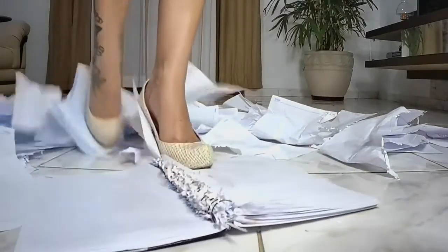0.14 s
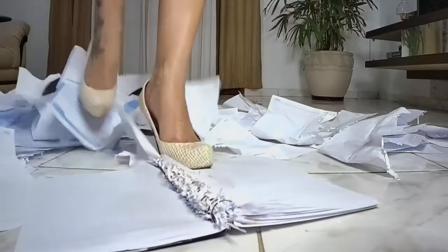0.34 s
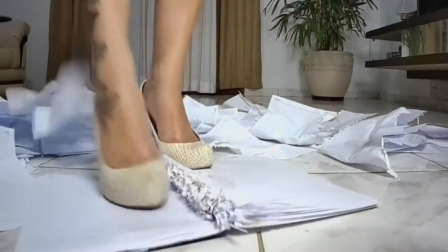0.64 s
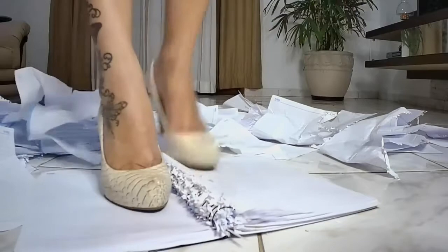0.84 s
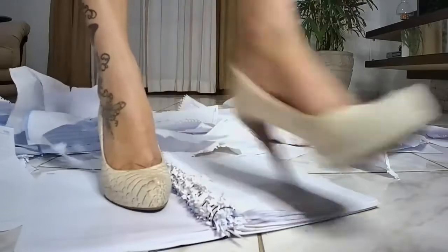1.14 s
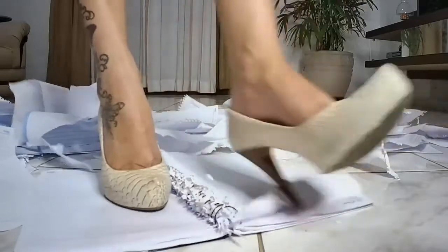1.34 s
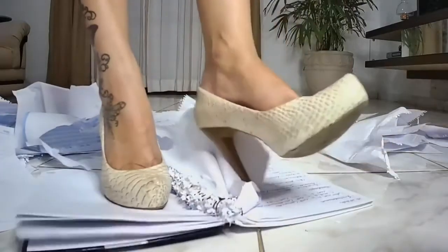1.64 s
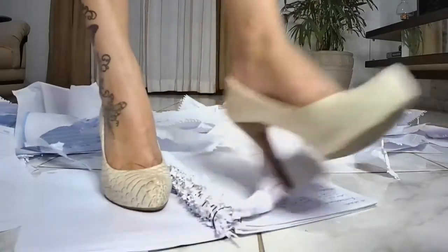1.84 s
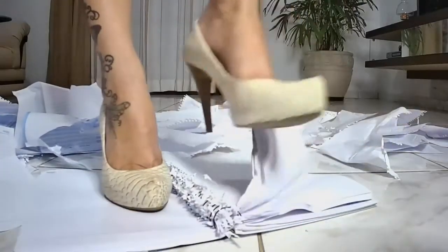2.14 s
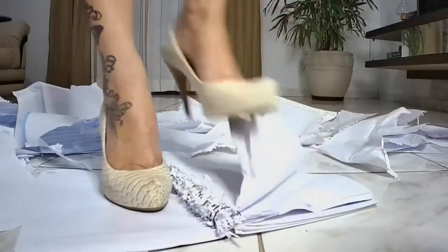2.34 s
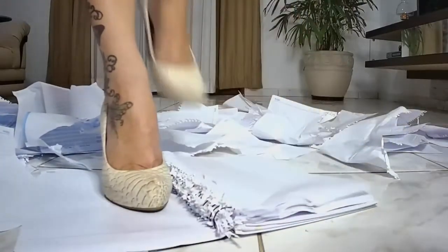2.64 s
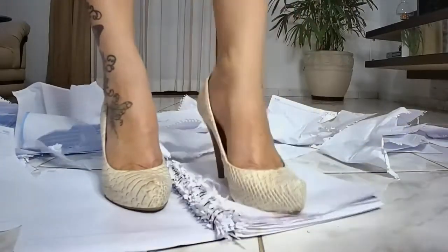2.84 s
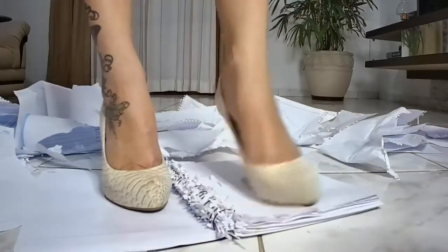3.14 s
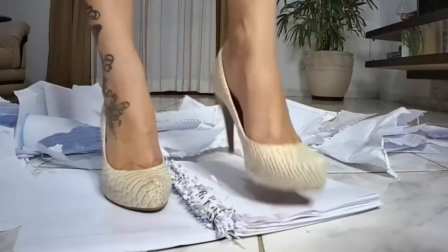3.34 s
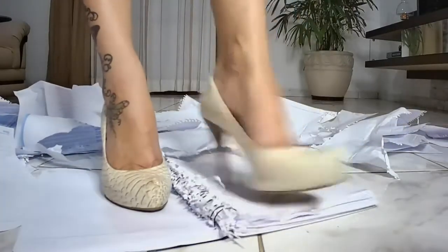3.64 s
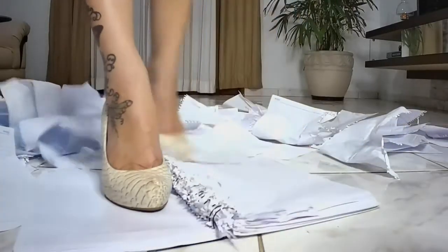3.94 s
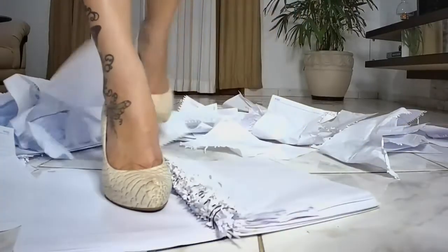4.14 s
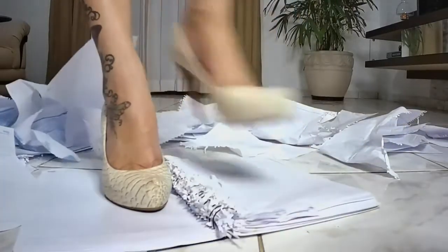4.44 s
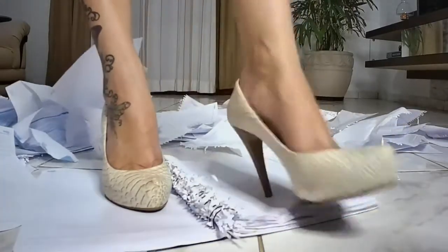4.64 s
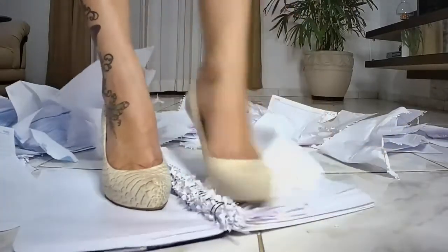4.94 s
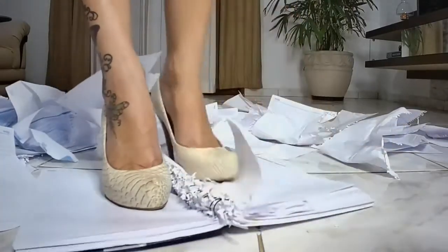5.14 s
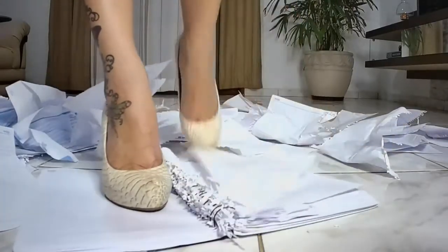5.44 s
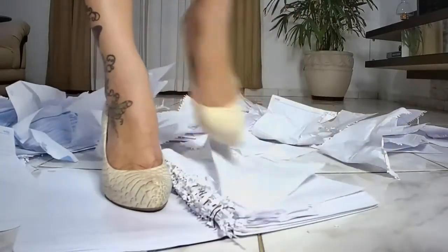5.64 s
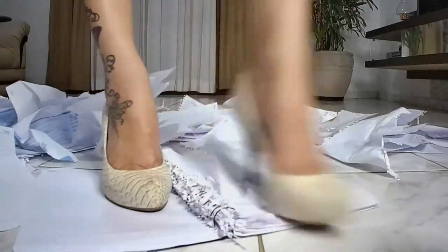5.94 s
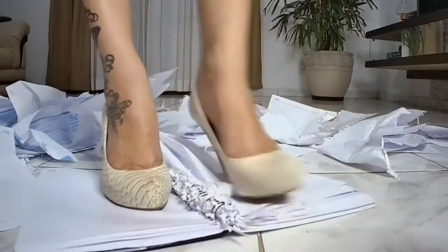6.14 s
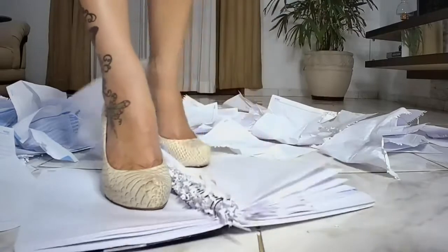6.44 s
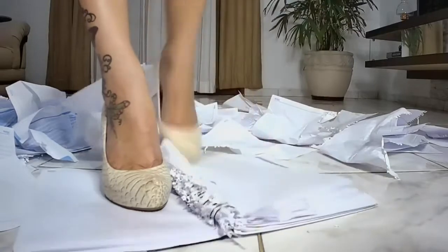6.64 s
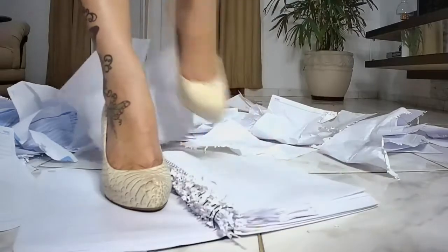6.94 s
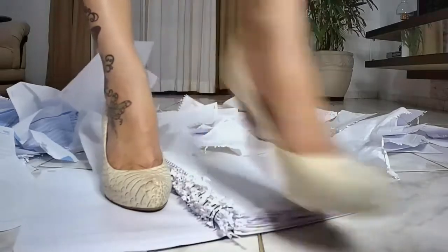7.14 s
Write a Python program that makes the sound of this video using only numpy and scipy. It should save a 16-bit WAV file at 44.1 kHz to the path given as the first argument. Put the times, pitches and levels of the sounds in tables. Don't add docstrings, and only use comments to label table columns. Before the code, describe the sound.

A close, slightly hissy phone pickup in a hard, tiled living room with a short bright ring. From 0 to 1 s paper rustles softly under a shoe, with tiny ticks. Around 1.2 s light hollow heel taps and a few crisp creases come, then faint rubbing, and small paper clicks and taps near 2.0 s. At 2.7 s a firm heel knocks the pad with a low thud. Quieter taps follow, a double knock at 3.4 s, then a loud bright drag with sharp cracks at 3.6-3.8 s, settling in rustle. After a lull, a knock at 4.6 s leads into strong crumpling and snapping around 4.9-5.0 s, with crackly scraping to 5.3 s. Near 5.9 s a crunch builds to the hardest stamp at 6.1 s, a dense burst of cracking paper. Short tugs at 6.5-6.6 s, faint rustles, and a last light scrape and tap at 7.2 s.

```python
import sys
import numpy as np
from scipy import signal
from scipy.fft import rfft, irfft
from scipy.io import wavfile
from scipy.ndimage import uniform_filter1d

SR = 44100
rng = np.random.default_rng(int(sys.argv[2]) if len(sys.argv) > 2 else 0)


def dump_mix(stems):
    frames = np.atleast_2d(stems).T
    limited = np.clip(frames, -1, 1)
    pcm = np.round(limited * 32767).astype(np.int16)
    wavfile.write(sys.argv[1], SR, pcm)


def voltage_ratio(decibels):
    exponent = np.asarray(decibels, float) / 20
    return 10 ** exponent


N = 321930

# freq_hz, level_db (per Hz)
AIR_COLOUR = [(12, -38), (20, -4.5), (47, -9.5), (140, -16.5), (180, -16), (306, -18.5), (534, -27),
              (958, -26), (1160, -28.5), (1920, -32), (8640, -39.5), (15500, -40.5)]
AIR_DB = -62.5
# freq_hz, t60_s, tail_db
ROOM_DECAY = [(121, 1, -6), (350, 0.68, -6), (1000, 0.66, -5.5), (2500, 0.66, -4.5), (6000, 0.31, -10),
              (12000, 0.17, -7)]
BAND_CENTRES_HZ = 70 * 2 ** np.arange(0, 8, .5)

# start_s, peak_db
FLOOR_THUDS = [(0.563, -39.5), (1.161, -41.5), (1.908, -42.5), (2.007, -34), (2.428, -51), (2.709, -25.5),
               (4.522, -41), (5.914, -36), (6.108, -29.5), (3.815, -35), (7.215, -47)]
FLOOR_HZ, FLOOR_OCTAVES = 116, .85
# start_s, peak_db, pitch_hz, spread_octaves
SHOE_KNOCKS = [(.6462, -40, 616, 0.34), (1.1564, -32, 468, 0.38), (1.1622, -30.5, 287, 0.93),
               (1.2315, -26.5, 630, 0.2), (1.7781, -39, 350, 0.88), (1.9716, -30.5, 506, 0.69),
               (2.0127, -35.5, 433, 0.88), (2.4288, -34, 507, .69), (2.7047, -16, 490, 0.78),
               (2.7183, -29, 900, .5), (2.724, -27, 420, 0.98), (2.9804, -28.5, 594, 0.5),
               (3.3707, -22, 387.3, 0.35), (3.3779, -18, 380, .45), (3.3812, -21, 420, .5),
               (7.243, -34, 450, .5), (5.327, -30, 700, .6), (3.376, -24, 185, .3), (6.17, -23, 175, .3),
               (3.5369, -33, 450, 0.83), (3.6791, -18, 535, 0.48), (3.6867, -32, 460, 0.3),
               (3.6944, -18.5, 425, 0.41), (3.7645, -24.5, 420, 0.9), (4.5132, -29.5, 666, .32),
               (4.5227, -34, 259, 0.37), (4.6291, -24.5, 510, 0.82), (5.1013, -29, 410, 0.93),
               (5.9272, -21, 590, 0.94), (6.0617, -28, 487, 0.97), (6.0809, -17, 650, .65),
               (6.0994, -22, 670, .3), (6.1325, -8, 520, 0.92), (6.4941, -30, 536, 0.78),
               (7.2189, -28.5, 620, 0.35)]

# start_s, length_s, centre_hz, spread_octaves, level_db
SINGING_HOLLOWS = [(2.165, 0.17, 8400, 0.37, -56), (3.39, .18, 300, .5, -49), (4.635, .09, 800, 1, -47),
                   (5.245, 0.06, 4300, 0.6, -35), (6.3, .16, 1450, .4, -47), (6.595, .03, 4000, .5, -35),
                   (0.685, .2, 1240, .25, -58), (6.1, .1, 1060, 0.7, -33), (4.745, .06, 750, 1.3, -39),
                   (4.9, .11, 450, 1.3, -37), (6.2, .13, 11000, .6, -35), (6.49, .06, 1500, 2, -45),
                   (6.66, .2, 1000, 1.6, -55), (7, .05, 400, 1, -55), (5.85, .025, 5500, 1, -36),
                   (.5, .06, 6000, 1.2, -60), (.6, .06, 6000, 1.2, -60), (6.8, .09, 7000, 1.8, -63),
                   (5.79, .025, 2200, 1, -57), (1.245, .03, 650, .6, -44), (5.69, .1, 1450, .15, -61),
                   (5.69, .09, 2800, .12, -61)]
# start_s, length_s, centre_hz, spread_octaves, level_db
FOLD_RATTLES = [(.348, .011, 3600, 1.3, -36), (.362, .03, 3500, 1, -48), (.399, .008, 700, .8, -48),
                (.421, .01, 1300, .7, -47), (.452, .012, 1050, 1.2, -42), (.553, .009, 1100, 1.2, -46),
                (.564, .009, 1200, 1.5, -48), (.576, .011, 700, 1.2, -46), (1.225, .012, 2200, 1.5, -42),
                (1.252, .012, 1300, 1, -40), (1.275, .01, 2500, 1.5, -43), (1.973, .009, 3200, 1.5, -39),
                (1.997, .008, 2600, 1.2, -43), (2.084, .012, 2600, 1, -44), (2.692, .009, 1300, 1.2, -38),
                (2.704, .026, 1800, 1.5, -33), (3.388, .018, 1300, 1.2, -46), (3.82, .07, 2000, 1.8, -33),
                (5.22, .03, 3800, .6, -38), (5.222, .07, 10000, .6, -36), (5.27, .03, 4700, .6, -26),
                (5.322, .03, 6000, 2.2, -35), (5.876, .008, 4100, .4, -27), (5.926, .008, 1500, 1, -29),
                (6.06, .2, 11000, .7, -34), (6.102, .008, 400, .8, -30), (6.14, .025, 900, 1, -27),
                (6.164, .006, 1450, .5, -22), (6.909, .008, 2700, .3, -48), (6.935, .03, 7500, .6, -51),
                (7.027, .008, 1400, 1, -44), (7, .065, 6500, 1.4, -53), (7.135, .014, 2700, .3, -58),
                (7.205, .03, 8500, .7, -46), (7.24, .016, 1000, 1.3, -44), (7.28, .02, 1300, .8, -41),
                (4.89, .22, 11000, .6, -38), (3.41, .035, 330, .7, -44), (3.48, .05, 190, .7, -50)]

# start_s, peak_db, centre_hz
WIDE_CRACKS = [(.3505, -27, 2200), (.6739, -27, 3900), (1.231, -29, 1600), (1.2478, -24.5, 1750),
               (1.255, -16, 7200), (1.2871, -25, 2600), (1.8923, -28, 5240), (2.7052, -21.5, 1270),
               (3.3655, -35.5, 2500), (3.3763, -26, 4500), (3.6271, -12.5, 8400), (3.6547, -14, 4140),
               (3.8172, -15, 2010), (4.6284, -26, 2200), (4.7392, -22, 7100), (4.918, -17.5, 2230),
               (4.9233, -10.5, 2200), (5.0031, -10, 2600), (5.9212, -11, 2500), (6.0803, -13.5, 1770),
               (6.0975, -7.5, 2600), (6.1148, -5.5, 2660), (6.123, -5.5, 2160), (6.1419, -5.5, 4020),
               (6.1548, -6.5, 3110), (6.1662, -6.5, 1600), (6.5608, -19, 4930), (6.5805, -23, 4500),
               (6.603, -23, 4270), (7.2185, -36, 1640),
               (.4535, -36, 4000), (1.2515, -29, 4500), (1.278, -31, 8000), (4.5095, -41, 3500),
               (.848, -47, 1990), (2, -38, 1800), (3.651, -12, 8000), (3.678, -21, 4030),
               (3.685, -22, 5000), (4.9746, -12.5, 2290), (5.0095, -24, 3000), (5.855, -33, 5000),
               (5.895, -21, 5000), (5.908, -20, 6000), (6.112, -18, 4030), (6.1458, -12, 2200),
               (6.1588, -12, 1300), (6.9103, -33, 1500), (6.926, -39, 4000), (7.047, -39, 2500),
               (1.532, -42, 1000), (1.6766, -42, 900)]
# start_s, peak_db, centre_hz
CREASE_CLICKS = [(.1378, -41, 1800), (1.189, -40, 800), (4.773, -26, 3000), (.4906, -51, 2180),
                 (.5785, -44, 1730), (.6454, -43, 1590), (.7145, -29.5, 4700), (1.363, -28, 6050),
                 (1.3867, -38, 5830), (1.7057, -42, 2760), (1.777, -45, 1950), (1.9263, -33, 3700),
                 (2.3263, -47, 2500), (2.7162, -24, 3500), (2.9634, -55, 2060), (3.5363, -36, 1360),
                 (3.7077, -15, 2000), (4.5186, -34, 2200), (4.5624, -49, 1700), (4.7496, -44, 2530),
                 (4.7837, -41, 2360), (5.3213, -19, 4500), (5.4505, -38, 2580), (5.8196, -42, 2270),
                 (5.8268, -37, 1640), (6.173, -28, 2350), (6.3664, -30, 4600), (6.4807, -33, 5500),
                 (7.0299, -37, 1500), (7.2478, -32, 2500)]
# start_s, peak_db, centre_hz
CREASE_PINGS = [(.5547, -36.5, 1330), (1.0935, -45, 2320), (1.1532, -36, 1130), (1.9717, -22, 2250),
                (1.9775, -24.5, 2820), (2.0039, -34, 2250), (2.0077, -26, 2460), (2.019, -31, 2380),
                (2.0825, -19, 2550), (2.0881, -32, 2940), (2.387, -53, 2300), (2.428, -40, 2000),
                (2.7158, -15, 8500), (2.9796, -31.5, 1700), (3.371, -26.5, 900), (3.8025, -12.5, 4400),
                (4.2853, -43, 2100), (4.5124, -34.5, 1000), (4.9784, -23, 2550), (5.1552, -28.5, 2430),
                (5.6892, -37.5, 1410), (5.8786, -20, 6500), (5.9286, -18, 2040), (6.4584, -31, 5500),
                (6.9138, -50, 2600), (7.1346, -43, 1600), (7.2067, -33, 1790), (7.2845, -31, 1350)]
# start_s, peak_db, centre_hz
EDGE_TICKS = [(4.7377, -24, 11300), (4.9223, -22, 10500), (5.0028, -17, 12500), (5.8955, -25, 11500),
              (5.907, -23, 11500), (6.0975, -21, 11000), (6.1145, -19, 9500), (6.1425, -17, 11500),
              (6.167, -20, 11000), (6.253, -27, 11500), (3.852, -22, 11500), (3.819, -22, 9500),
              (3.678, -21, 12000), (1.2555, -22, 11000), (7.031, -42, 5500), (3.3763, -32, 1500),
              (3.829, -16, 2000), (5.328, -25, 4300), (2.108, -40, 4800), (6.91, -44, 7000),
              (5.492, -38, 11000), (5.51, -46, 10700)]
CRACK_OCTAVES, CLICK_OCTAVES, PING_OCTAVES = 2.5, 1.6, 0.99
ECHO_S, ECHO_DB = .0036, -14.5

# freq_hz, level_db (per Hz)
SHEET_COLOUR = [(35, -48), (60, -21), (189, -2), (308, -3.5), (389, -4), (437, 1), (593, -2), (1110, -2),
                (1580, -1.5), (11300, 4), (16000, -1.5)]
ZONE_CENTRES_HZ = [
    1700,
    400,
    4500,
    10000,
]
# level_db, brightness_share (ratio), fade_speed (ratio)
ZONE_ANSWERS = [
    (-0.5, -0.14, 1.02),
    (-7.5, -0.12, 0.99),
    (0.8, 0.48, 1.026),
    (.2, 0.73, 1.22),
]
# start_s, rise_s, hold_s, level_db, brightness_db
SETTLING_HEAPS = [(-.02, 0.011, .06, -40, -4), (.65, .035, .02, -51, -3), (1.28, 0.018, .01, -51.5, 1.5),
                  (1.83, 0.034, .005, -46.5, -7), (1.95, 0.021, 0.0037, -47.5, -8.5),
                  (2.07, .0083, .019, -61, -10), (2.72, .0085, .03, -49.5, 2),
                  (3.765, .045, .045, -30.5, -1), (4.1, 0.017, 0.041, -51.5, -5.5),
                  (4.27, .02, .04, -61, -5), (4.89, 0.015, 0.025, -30.5, -12),
                  (5.3, 0.0071, 0.0072, -42.5, -2.5), (5.68, 0.0067, .005, -61.5, -13),
                  (6.062, .05, 0.068, -28.5, -3), (6.26, 0.01, 0.0079, -45, 8.5),
                  (6.45, 0.12, 0.022, -42, 3.5), (6.95, 0.036, .075, -56, -5)]
# start_s, rise_s, hold_s, level_db, brightness_db
SHEET_DRAGS = [(.15, 0.037, 0.094, -52.5, -1), (.3, 0.023, 0.15, -49.5, -8.5),
               (.55, 0.012, 0.011, -51.5, -7.5), (1.4, 0.02, 0.16, -52.5, -4.5),
               (1.63, 0.04, 0.14, -52, -5.5), (2.952, 0.02, 0.066, -57.5, 2.5), (3.355, .012, .029, -54, 1),
               (3.505, .035, .015, -53, 5), (3.614, .02, .065, -31, 5), (4.505, 0.0035, 0.0044, -56, -9),
               (4.62, 0.03, 0.12, -52, 0), (4.83, 0.041, 0.08, -38.5, -3), (4.96, .02, .017, -44, 4),
               (5.14, .089, .032, -43.5, 11.5), (5.24, .038, .019, -43, 14.5), (5.4, .03, 0.018, -52.5, -4),
               (5.85, 0.056, 0.013, -33.5, 0), (7.195, 0.013, .1, -45.5, -5.5)]
# start_s, rise_s, hold_s, level_db, brightness_db
SHORT_TUGS = [(-.02, .01, .03, -39, -4), (1.144, 0.011, 0.016, -52.5, -4),
              (1.167, 0.081, 0.036, -43.5, -8.5), (2.125, 0.08, .09, -60, 7.5),
              (2.418, 0.0088, .005, -52.5, -19), (2.693, .004, .03, -38, -1), (6.576, 0.0033, .035, -41, 6),
              (6.453, 0.0034, .008, -47, 9), (6.557, .003, 0.0056, -38, 5.5),
              (5.874, 0.0034, 0.0063, -36.5, 7.5), (.671, .003, .006, -45, 1.5), (4.717, .02, .05, -42, 5),
              (5.83, .05, .013, -50, 9), (6.045, 0.015, 0.0088, -36.5, -14),
              (6.909, 0.0025, .012, -51.5, -19), (6.925, 0.014, 0.023, -59, 17),
              (1.3, 0.0053, 0.034, -67, -15), (4.43, 0.0083, 0.041, -65, -6), (5.79, .03, .02, -66, 8),
              (.33, 0.017, .02, -51, 1), (3.12, 0.022, 0.018, -69, -17)]
# start_s, hold_s, level_db
SHEET_FLAPS = [(-.01, .03, -40), (0.546, .012, -52), (1.146, 0.01, -53), (2.71, 0.012, -54),
               (2.96, 0.023, -53), (3.364, 0.025, -44), (3.456, .1, -49.5), (3.615, .065, -41),
               (4.501, .012, -50.5), (4.62, 0.035, -51), (6.56, .05, -43.5), (7.184, .03, -50.5)]
HEAP_FADE_DB_S, DRAG_FADE_DB_S, TUG_FADE_DB_S, FLAP_FADE_DB_S = 87.5, 172, 378, 211
FLAP_RISE_S, RISE_DB = 0.0036, 15
CREEP = 7.3


def on_log(table, hz, column=1):
    rows = np.array(table)
    return np.interp(np.log(hz), np.log(rows[:, 0]), rows[:, column])


def band(x, hz, octaves):
    half = 2 ** (octaves / 2)
    edges = np.clip([hz / half, hz * half], 20, .46 * SR)
    return signal.sosfilt(signal.butter(2, edges, "band", fs=SR, output="sos"), x)


def unit(x):
    return x / np.sqrt(np.mean(x ** 2))


def burst(s, db, shape, out):
    size = abs(shape)
    start = max(int(s * SR) - np.argmax(size), 0)
    return np.pad(voltage_ratio(db) * shape / size.max(), (start, N))[:N] + out


def air():
    hz = np.maximum(np.arange(N // 2 + 1) * SR / N, 1)
    spectrum = rfft(rng.standard_normal(N)) * voltage_ratio(on_log(AIR_COLOUR, hz))
    return voltage_ratio(AIR_DB) * unit(irfft(spectrum, N))


def room(x):
    t, tail = np.arange(SR) / SR, 0
    echoes = rng.standard_normal(SR) * (1 - np.exp(-t / 0.0041))
    for hz in BAND_CENTRES_HZ[::2] * 1.2:
        fade = voltage_ratio(-60 * t / on_log(ROOM_DECAY, hz))
        level = voltage_ratio(on_log(ROOM_DECAY, hz, column=2)) / np.sqrt(np.sum(fade ** 2))
        tail = tail + level * band(echoes, hz, octaves=0.76) * fade
    return x + signal.fftconvolve(x, tail)[:N]


def knocks():
    t, out = np.arange(1800) / SR, 0
    rows = SHOE_KNOCKS + [(s, db, FLOOR_HZ, FLOOR_OCTAVES) for s, db in FLOOR_THUDS]
    for s, db, hz, octaves in rows:
        scuff = rng.standard_normal(len(t)) * np.exp(-t / 0.0062)
        push = np.exp(-((t * hz - .4) / 0.066) ** 2) + voltage_ratio(-27) * scuff
        ring = band(push, hz, np.clip(2.08 * octaves, .3, 3))
        out = burst(s, db - .5, ring, out)
    return out


def hollows():
    t, out = np.arange(SR // 4) / SR, np.zeros(N + SR)
    for s, length, hz, octaves, db in SINGING_HOLLOWS + FOLD_RATTLES:
        ring = unit(band(rng.standard_normal(len(t)), hz, np.clip(octaves, .1, 3)))
        swell = np.sin(np.pi * np.sqrt(np.clip(t / length, 0, 1)))
        start = int(s * SR)
        out[start:start + len(t)] += voltage_ratio(db) * swell * ring
    return out[:N]


def snaps():
    t, out = np.arange(900) / SR, 0
    kinds = [(WIDE_CRACKS, CRACK_OCTAVES, -12),
             (CREASE_CLICKS, CLICK_OCTAVES, -15),
             (CREASE_PINGS + EDGE_TICKS, PING_OCTAVES, -11)]
    for rows, octaves, rattle_db in kinds:
        envelope = voltage_ratio(-7) * np.exp(-t / .0006) + voltage_ratio(rattle_db) * np.exp(-t / 0.0035)
        for s, db, hz in rows:
            push = -1.4 * (t == 0) + rng.standard_normal(len(t)) * envelope
            push = push + voltage_ratio(ECHO_DB) * np.roll(push, int(ECHO_S * SR))
            soften = signal.butter(1, min(2.5 * hz, .45 * SR), fs=SR)
            push = signal.lfilter(*soften, push)
            out = burst(s, db + 2.0, band(push, hz, octaves), out)
    return out


def creases(per_s, spread_db):
    hit = rng.random(N) < per_s / SR
    size = voltage_ratio(spread_db * np.minimum(rng.exponential(size=N), 4))
    return unit(hit * rng.standard_normal(N) * size)


def flicker(per_s):
    k = int(SR / per_s)
    held = np.repeat(rng.standard_normal(N // k + 1), k)
    return uniform_filter1d(held, k // 2)[:N]


def move(t, start, rise, hold, db, fade_db_s):
    early = np.maximum(1 - (t - start) / max(rise, .002), 0)
    late = np.maximum(t - start - rise - hold, 0)
    below = RISE_DB * (early + CREEP * np.maximum(early - 1, 0)) + fade_db_s * late
    return voltage_ratio(db - np.minimum(below, 200)) ** 2


def effort():
    t = np.arange(0, N / SR + .001, .001)
    power = np.full((len(ZONE_ANSWERS), len(t)), 1e-10)
    kinds = [(SETTLING_HEAPS, HEAP_FADE_DB_S), (SHEET_DRAGS, DRAG_FADE_DB_S), (SHORT_TUGS, TUG_FADE_DB_S)]
    for rows, fade in kinds:
        for s, rise, hold, db, bright_db in rows:
            for zone, (zone_db, share, speed) in enumerate(ZONE_ANSWERS):
                power[zone] += move(t, s, rise, hold, db + zone_db + share * bright_db, fade * speed)
    for s, hold, db in SHEET_FLAPS:
        power[1] += move(t, s, FLAP_RISE_S, hold, db, FLAP_FADE_DB_S)
    return np.array([np.interp(np.arange(N) / SR, t, 10 * np.log10(p)) for p in power])


def sheet_db(hz):
    return on_log(SHEET_COLOUR, hz) + 10 * np.log10(hz)


def paper():
    zones = effort()
    order = np.argsort(ZONE_CENTRES_HZ)
    rank = np.argsort(order)
    zone_colour = sheet_db(np.array(ZONE_CENTRES_HZ))
    wide, out = creases(per_s=900., spread_db=2.8), 0
    jerks = flicker(per_s=90.)
    for hz in BAND_CENTRES_HZ:
        place = np.interp(np.log(hz), np.log(ZONE_CENTRES_HZ)[order], np.arange(len(order)))
        weight = np.maximum(1 - abs(place - rank), 0)
        db = weight @ zones + sheet_db(hz) - weight @ zone_colour
        db = db + .8 * jerks + 1.2 * flicker(per_s=50.)
        small = creases(per_s=.3 * hz, spread_db=2.2)
        fibres = rng.standard_normal(N)
        grains = voltage_ratio(-3) * wide + voltage_ratio(-4) * small + voltage_ratio(-5) * fibres
        out = out + voltage_ratio(db) * unit(band(grains, hz, octaves=0.59))
    return voltage_ratio(-3) * out


def scene():
    dull = signal.butter(2, 13100., fs=SR, output="sos")
    close = signal.sosfilt(dull, knocks() + hollows() + snaps() + paper())
    return (room(close) + air())[None]


def band_limit(x):
    return signal.sosfilt(signal.butter(12, 16740, fs=SR, output="sos"), x)


def record(dry):
    rounded = np.tanh(1.387 * dry) / 1.411
    top = signal.ellip(8, .2, 60, 15900, fs=SR, output="sos")
    mix = signal.sosfilt(top, rounded)
    return band_limit(mix)


dry = scene()
out = record(dry)
dump_mix(out)
```